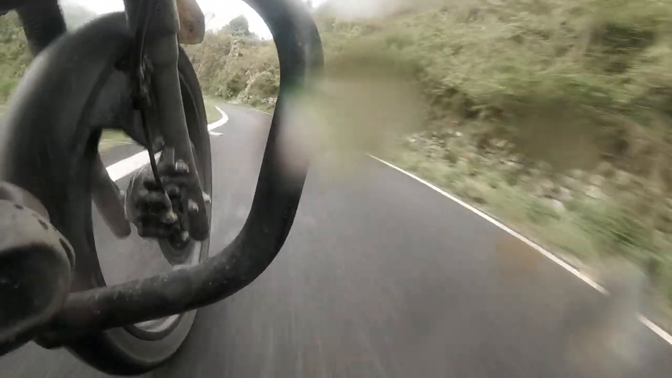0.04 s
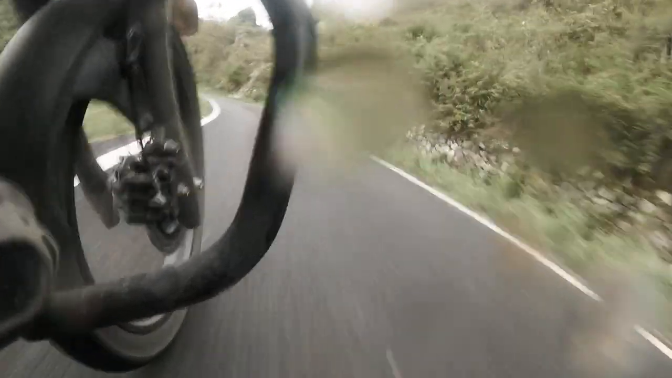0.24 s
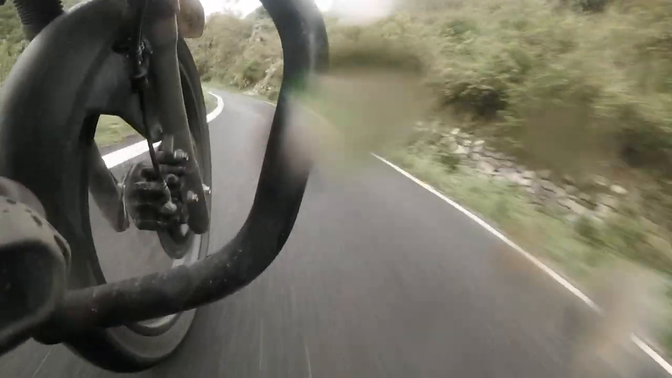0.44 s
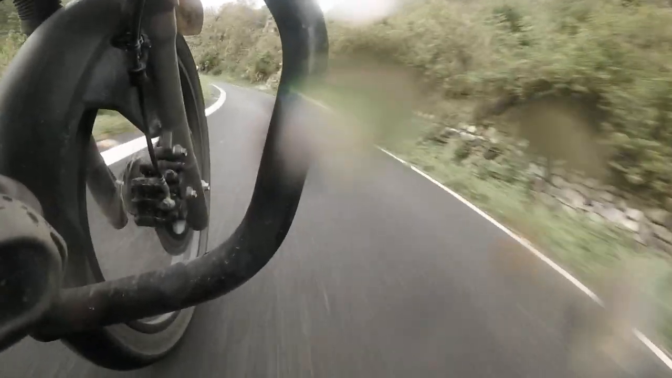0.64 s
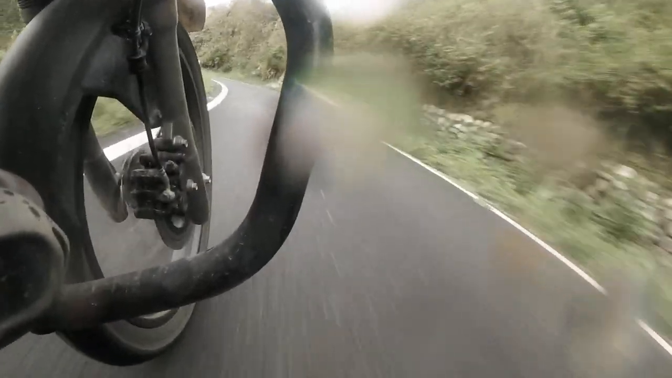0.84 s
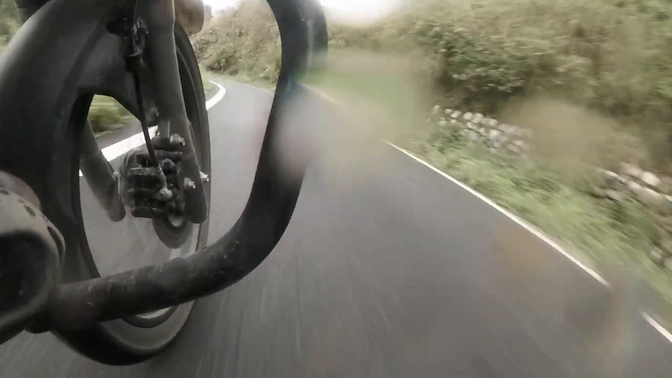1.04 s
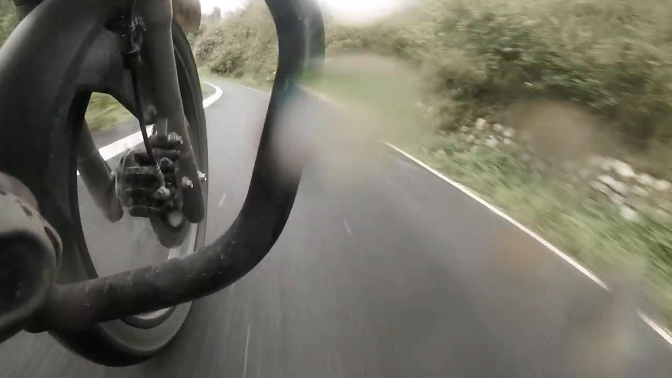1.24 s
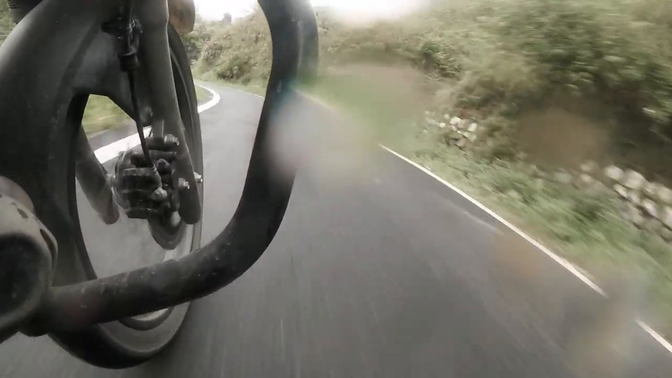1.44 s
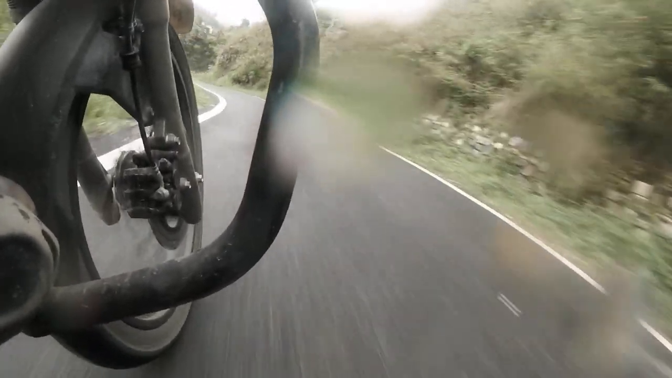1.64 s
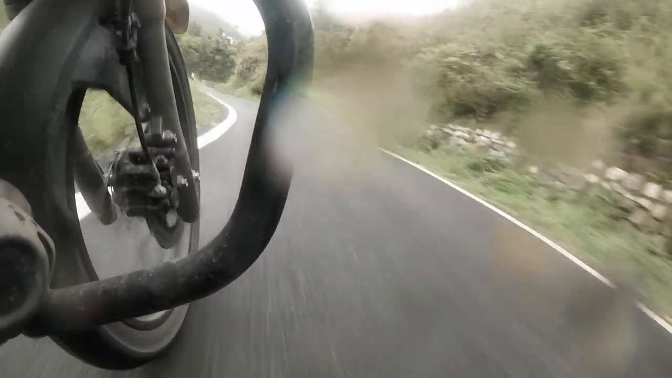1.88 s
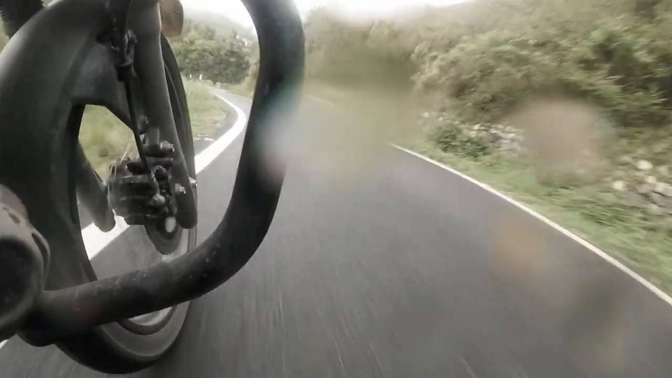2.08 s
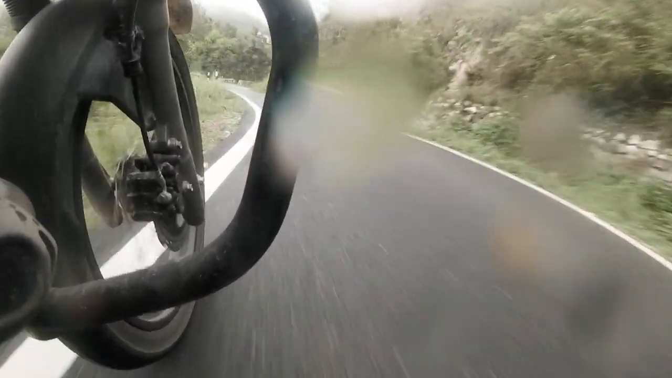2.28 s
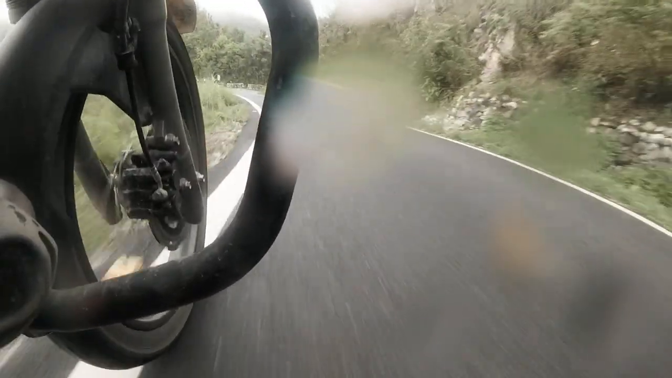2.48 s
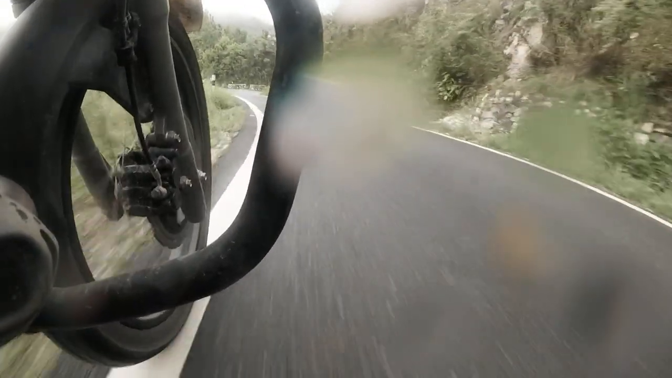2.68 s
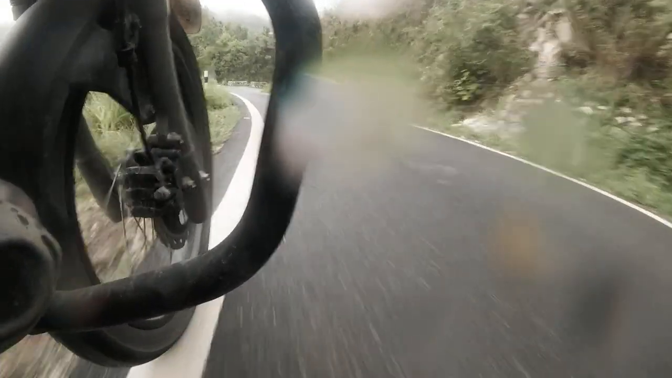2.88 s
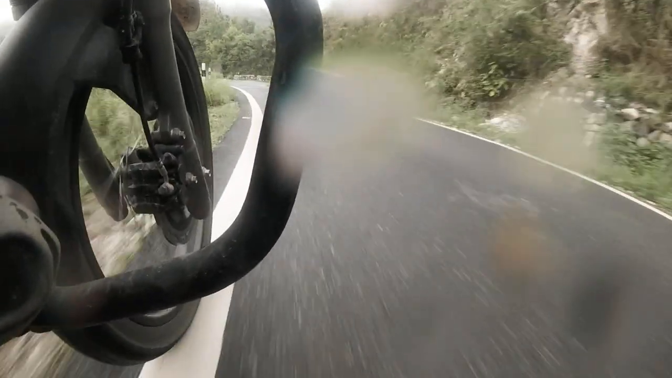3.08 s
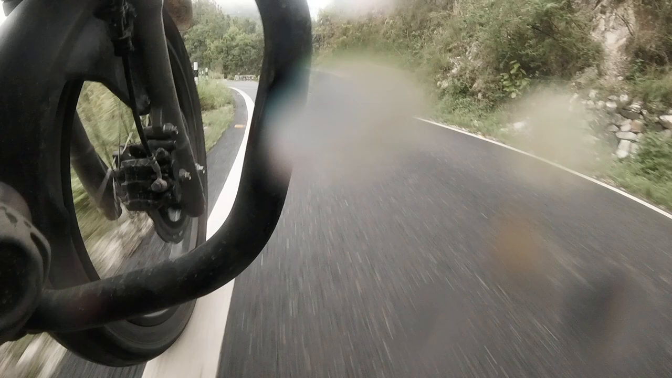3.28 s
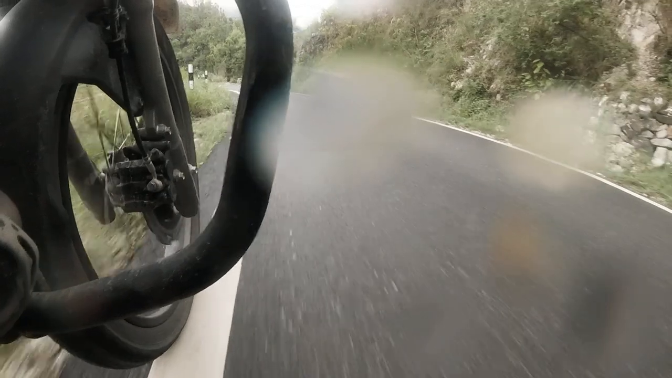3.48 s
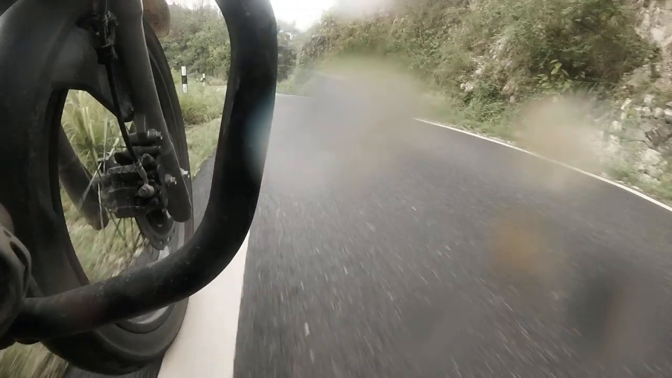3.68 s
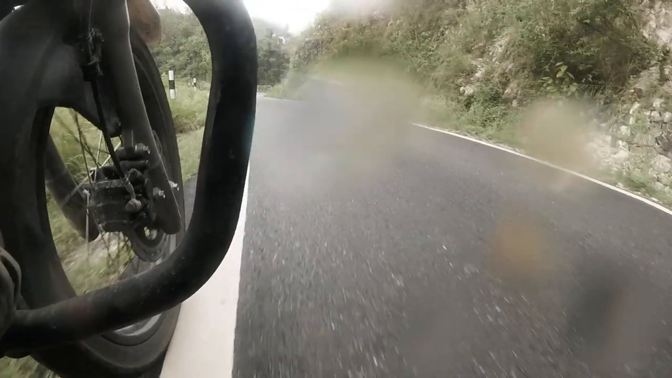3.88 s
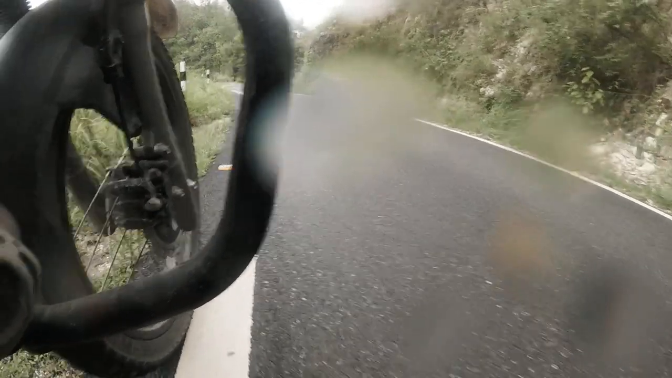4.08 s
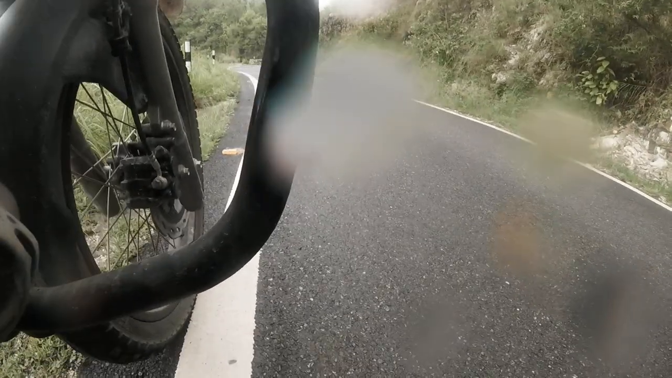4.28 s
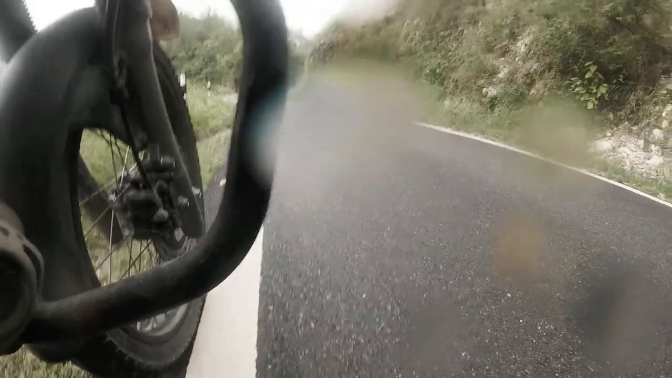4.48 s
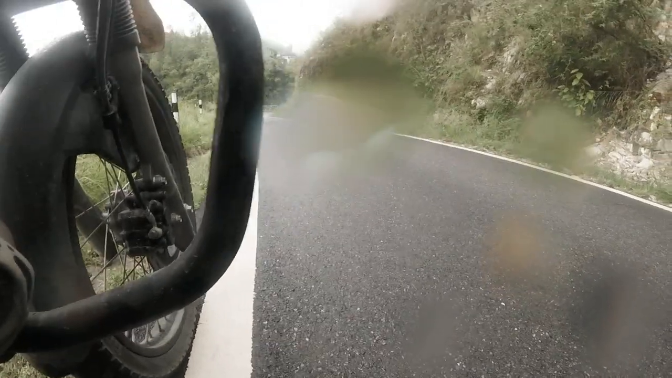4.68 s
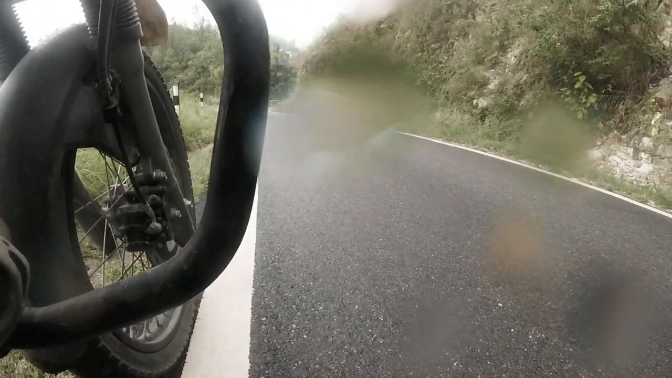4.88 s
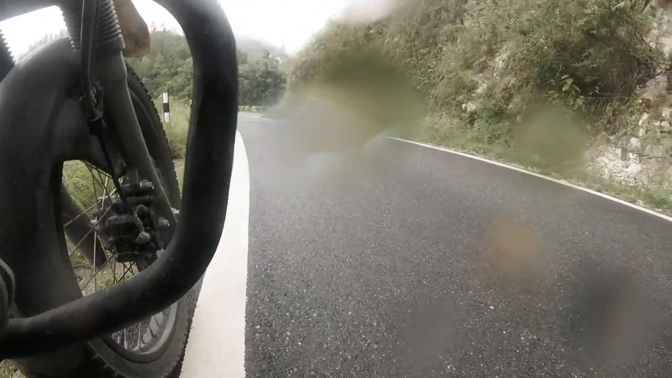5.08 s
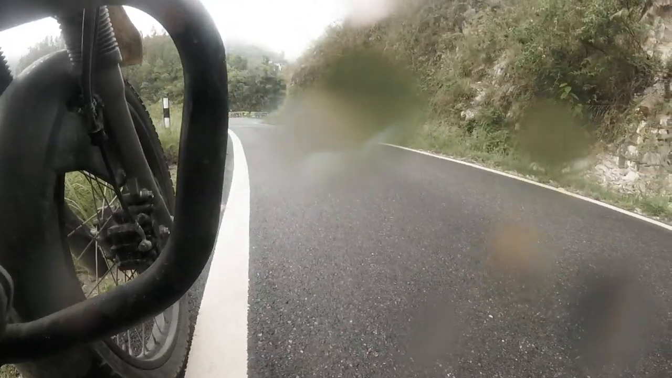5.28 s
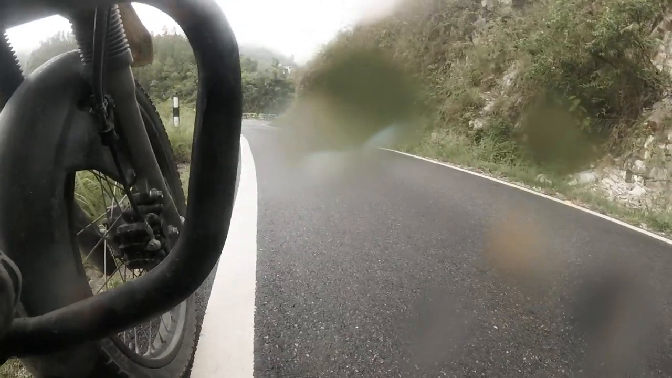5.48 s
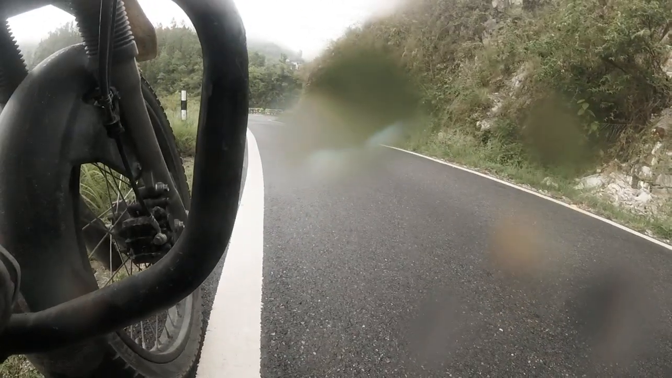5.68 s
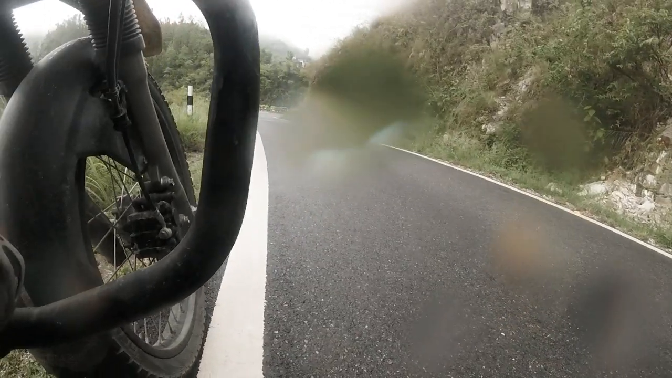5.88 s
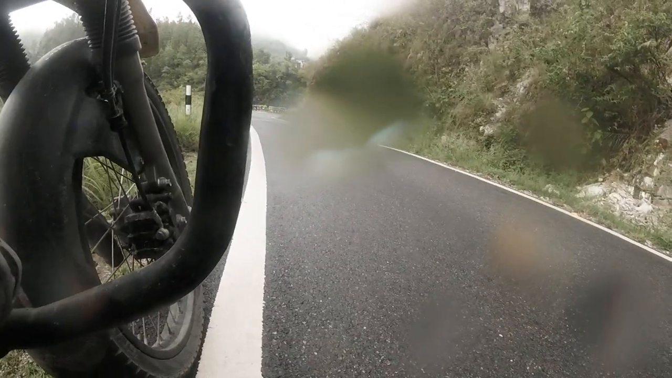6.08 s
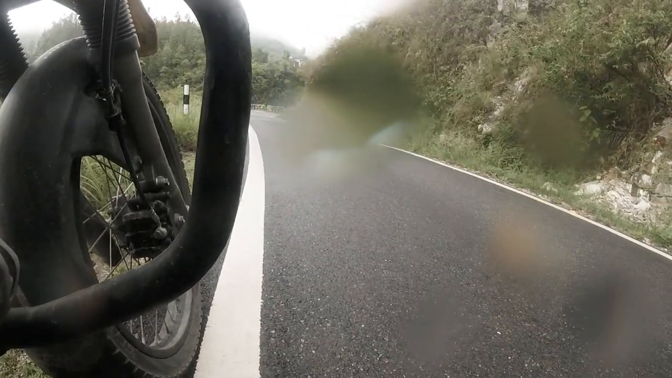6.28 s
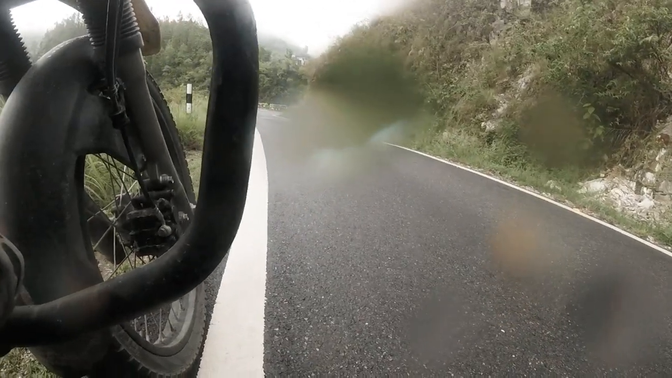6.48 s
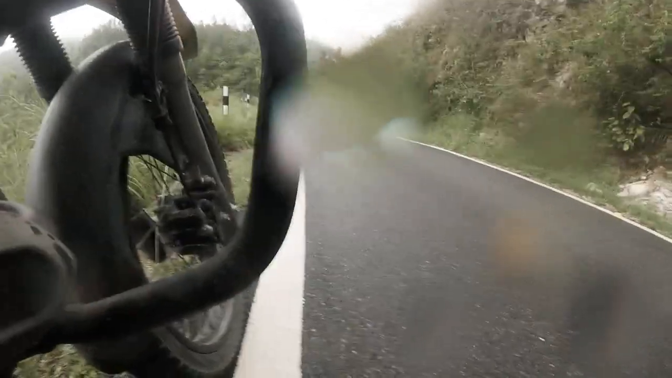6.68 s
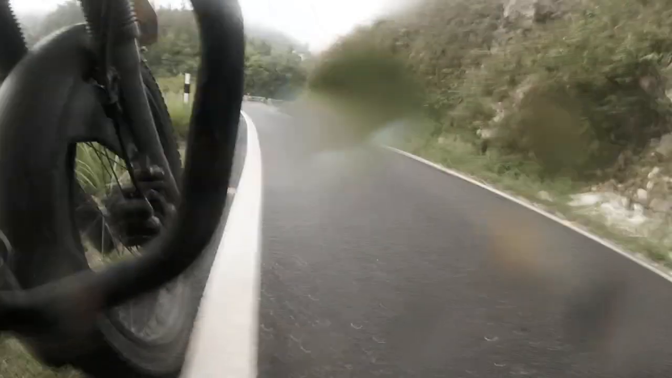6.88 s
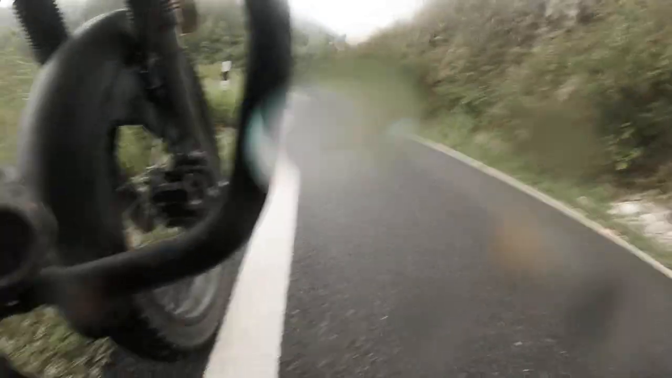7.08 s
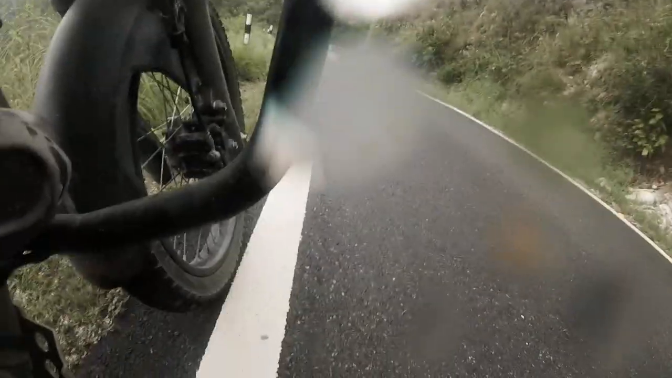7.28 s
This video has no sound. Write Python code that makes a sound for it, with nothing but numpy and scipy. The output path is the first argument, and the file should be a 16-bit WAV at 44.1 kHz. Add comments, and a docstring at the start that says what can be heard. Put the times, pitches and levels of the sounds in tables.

```python
"""Wind buffets and crackles on a closed camera case, low on a motorcycle coasting down a wet road.
The eddies thin out as it stops, and the single cylinder idles in pressure pulses, then is switched
off and runs down with a squeak. A lever snaps, bounces and scrapes; an insect's wings buzz.
Last the bike is tipped: the case thumps, and stick-slip friction makes its mount creak."""
import sys
import numpy as np
from scipy import signal
from scipy.fft import rfft, irfft, next_fast_len
from scipy.io import wavfile
from scipy.ndimage import uniform_filter1d, map_coordinates

SR = 44100
rng = np.random.default_rng(int(sys.argv[2]) if len(sys.argv) > 2 else 0)


def unload_wav(signal):
    """Save mono or channel-first audio to the path in sys.argv[1] as 16-bit WAV at rate SR, clipped to [-1, 1]."""
    wavfile.write(
        sys.argv[1],
        SR,
        np.round(np.clip(np.atleast_2d(signal).T, -1, 1) * 32767).astype(np.int16),
    )


N = 323694

# Buffeting: time_s, level_db, eddies_per_s
BUFFET = [(0, -14.5, 61.5), (.15, -17.5, 64.5), (.5, -17, 54.5), (.8, -18.5, 60.5), (1.1, -20, 52.5),
          (1.45, -17.5, 57), (1.7, -17, 45), (2.15, -21.5, 40), (2.55, -21, 34.5), (2.9, -23.5, 31),
          (3.2, -27.5, 29), (3.5, -30, 27), (4.0, -46.5, 22.3)]
# Colour of the wind at high and at low speed: frequency_hz, gain_db
FAST_WIND_SPECTRUM = [(12, -33), (20, -5.5), (47, 3), (65, -2), (90, -3.5), (126, -9.5), (349, -14.5),
                      (509, -24.5), (742, -31.5), (4000, -73), (5200, -99), (8800, -120)]
SLOW_WIND_SPECTRUM = [(12, -35), (20, 0), (43, -3.5), (416, -25), (841, -45), (921, -42), (1050, -52),
                      (1140, -49), (1500, -42), (1950, -73.5), (3300, -120)]
# Sharpest eddies: time_s, level_db, sign
PRESSURE_STEPS = [(0.0705, -10, 1), (0.1171, -16, 1), (0.2216, -17, 1), (0.238, -15, 1), (0.259, -16, -1),
                  (0.286, -14, 1), (0.615, -13, 1), (0.6286, -17, -1), (0.6718, -14, 1), (0.698, -13, 1),
                  (0.757, -16.5, 1), (0.855, -14, 1), (0.8742, -17, 1), (1.003, -14, 1), (1.328, -22, -1),
                  (1.3408, -16, 1), (1.3653, -13, -1), (1.4186, -13.5, 1), (1.4686, -21, 1),
                  (1.4902, -16.5, -1), (1.5268, -20, 1), (1.5732, -14, 1), (1.7142, -19, -1),
                  (1.7363, -19, 1), (1.8026, -14, 1), (1.9425, -16.5, -1), (1.9953, -14, 1),
                  (2.0628, -18.5, 1), (2.1216, -14.5, -1), (2.3433, -16.5, 1), (2.4306, -14, 1),
                  (2.5464, -18, -1), (2.5957, -18, 1), (2.8768, -18.5, 1), (3.261, -19, 1)]
# Band of the noise over each step: centre_hz, width_hz, gain_db
SPIT_BAND = [(1400, 2400, 4)]
# Steady stretches of idling: start_s, firing_gap_s
IDLE_STRETCHES = [(3.491, .0746), (4.013, .0813), (4.338, .0752)]
# Engine noise: time_s, level_db
ENGINE_RUSH = [(0, -38.5), (.6, -48.5), (1.7, -47), (2.7, -44), (3.5, -37), (4, -35.5), (4.65, -32.5),
               (5.08, -33), (5.3, -35), (5.45, -39), (5.6, -48), (5.7, -55)]
# Its bright and dark parts: frequency_hz, gain_db
HISS_SPECTRUM = [(1060, -32.5), (1800, -9), (2140, -16), (2330, -5.5), (2840, -6), (3110, -4.5), (3580, -8),
                 (4050, -9.5), (4360, -10), (6070, -3), (7810, -14.5), (10200, -23.5), (17200, -120)]
BODY_SPECTRUM = [(120, -43), (220, -17), (300, -6), (674, -6), (798, -11.5), (897, -10.5), (1510, -9.5),
                 (2500, -17), (3250, -37), (5500, -120)]
# Engine castings, and rings that emerge in the run-down: centre_hz, width_hz, gain_db
CASTING_MODES = [(450, 30, -5), (650, 25, -3), (720, 22, -3), (795, 32, 3), (985, 13, 2), (1110, 18, -2),
                 (1310, 35, -4), (1485, 26, 0), (1640, 26, -2), (2280, 28, -12), (3040, 45, -12)]
RUN_DOWN_MODES = [(447, 30, -3), (985, 9, 5), (1075, 20, -5)]
# Thin metal ringing in the hiss: centre_hz
FIN_MODES = [3990, 4600, 5000, 5370, 5850, 6050, 6270, 6500]
# Squeak: time_s, pitch_hz, level_db
SQUEAK_GLIDE = [(5.547, 4900, -64), (5.556, 5450, -47), (5.582, 5730, -46), (5.6, 5200, -42.5),
                (5.635, 4970, -57), (5.665, 4600, -65), (5.685, 4800, -69)]
# Single slips of the mount: start_s, high_db, low_db
MOUNT_SLIPS = [(6.669, -52, -67), (6.6916, -32, -37), (6.696, -34, -45), (6.7118, -20.5, -22),
               (6.726, -24, -26), (6.772, -44, -56), (6.7916, -25, -34), (6.801, -21.5, -40),
               (6.805, -23, -38), (6.809, -36, -35), (6.812, -21, -18.5), (6.8152, -25, -27),
               (6.8302, -23, -32), (6.847, -26, -33), (6.855, -27, -22), (6.874, -21, -32),
               (6.88, -11, -25), (6.897, -19, -43), (6.9006, -18, -36), (6.969, -23, -19),
               (7.0642, -65, -31), (7.073, -60, -42), (7.124, -53, -54), (7.2253, -32, -11.5),
               (7.232, -49, -30.5), (7.2388, -52, -20), (7.2565, -47, -43), (7.314, -48, -54)]
# Dense creaks: start_s, length_s, first_db, last_db, steady_grind_share
DENSE_CREAKS = [(6.882, 0.083, -26, -14.5, 0.26), (7.13, 0.095, -47, -22.5, 0.2),
                (7.24, 0.017, -57, -40, 0.3), (7.29, 0.04, -43, -43, 0.1)]
# High, middle and low mode groups of the case: centre_hz, width_hz, gain_db
CASE_MODES = [
    [(5210, 780, 3.5), (6500, 430, 7), (7800, 800, -6.5), (10300, 4600, -16.5)],
    [(1230, 460, -26), (2140, 380, 2), (3100, 2900, -12.5)],
    [(190, 177, 2.5), (470, 200, 2.5), (740, 240, 3)],
]
# Knocks on the case: start_s, level_db, brightness_db
CASE_KNOCKS = [(6.3049, -6.5, -14.5), (6.317, -33, 6), (6.326, -36.5, 8), (6.344, -36.5, 9),
               (6.357, -34.5, 2), (6.4, -45, -1), (6.409, -30, -6), (6.417, -32, -10), (6.55, -36, 0.5)]
# Shifts of weight: time_s, level_db, swing_hz, shudder_db
WEIGHT_SHIFTS = [(5.9, -27, 60, -38.5), (6.442, -24, 34, -44.5), (6.52, -40, 40, -45),
                 (6.702, -23, 70, -56), (6.741, -20, 60.4, -47), (6.774, -21.5, 28.8, -52),
                 (6.815, -14, 111, -30.5), (6.862, -14.5, 89.5, -53), (6.989, -7, 39.2, -26.5),
                 (7.012, -16.5, 25.7, -57), (7.21, -9, 114, -26.5), (7.248, -15, 69.4, -29.5)]
# Lever and scraped frame: centre_hz, width_hz, gain_db
LEVER_MODES = [(740, 150, -11), (1320, 250, -7), (1850, 200, -8), (2280, 160, 3), (3000, 700, -14),
               (3900, 500, -13), (5200, 450, -8), (6100, 900, -14)]
FRAME_MODES = [(1650, 500, -10), (2220, 320, -1), (3100, 800, -12), (3950, 450, -10), (5200, 700, -8),
               (6400, 900, -12)]
# Scraping: time_s, level_db, low_ring_db
SCRAPE_LEVELS = [(5.703, -29, -35.5), (5.76, -40, -41), (5.8, -48, -45.5), (5.87, -45.5, -43.5),
                 (5.92, -39.5, -44.5), (5.98, -42.5, -50.5), (6.01, -46, -63), (6.13, -53.5, -65),
                 (6.19, -63, -68)]
# Insect buzz and rocking of the frame: time_s, level_db
BUZZ_LEVELS = [(6.15, -65), (6.185, -57.5), (6.3, -56.5), (6.494, -54.5), (6.503, -61), (6.525, -72)]
SWAY_LEVELS = [(3.2, -36.5), (3.7, -39.5), (4.2, -39.5), (4.9, -37.5), (5.15, -38), (5.4, -44.5),
               (6.0, -46.5), (6.3, -43), (6.6, -42.5), (7.34, -41)]
# Still air: frequency_hz, gain_db
AIR_SPECTRUM = [(180, -35), (300, -22), (680, -1.5), (846, -7), (1020, -8.5), (1790, -14), (4340, -31.5),
                (6280, -14), (7810, -20.5), (10200, -32.5), (17200, -120)]

WHEEL_STOP_S, IGNITION_OFF_S = 4.1, 5.015
TIME_S = np.arange(N) / SR


def wind():
    """Turbulence: each eddy pushes on the case; fewer and duller ones come as the bike slows."""
    buffet = curves(BUFFET)[0]
    crackle_level = amp(-34 - 2 * TIME_S + wobble(8.02)) * (buffet / amp(-20.5)) ** .54
    times, _, eddies_per_s = np.transpose(BUFFET)
    eddies = pulses(np.interp(TIME_S, times, eddies_per_s), jitter=.12, scatter_db=3)
    drive = unit(eddies) + .73 * amp(.64 * wobble(14)) * rng.standard_normal(N)
    dull = filtered(drive, lambda hz: 1 / (1 + (hz / 280) ** 4))
    slow = np.clip((TIME_S - .8) / .89, 0, 1)
    push = (1 - slow) * coloured(dull, FAST_WIND_SPECTRUM) + slow * coloured(dull, SLOW_WIND_SPECTRUM)
    return buffet * push + crackle_level * crackle(eddies) + slaps()


def crackle(eddies):
    """Eddy breakdown: the flow tears at the crests and in between, in pops, bursts and steady noise."""
    pops = eddies ** 1.1 + pulses(np.full(N, 190.), jitter=.55, scatter_db=4.2)
    bursts = signal.oaconvolve(pops, np.hanning(260), "same") * rng.standard_normal(N)
    tearing = amp(1.3 * wobble(30.3)) * rng.standard_normal(N)
    rough = .85 * unit(pops) + .75 * unit(bursts) + .4 * tearing

    def colour(hz):
        lift_db = 4 * np.exp(-3 * np.log((hz + 1) / 1700) ** 2)
        tilt = (hz / 300) ** .61 / (1 + (300 / (hz + 1)) ** 4)
        return -1j * amp(along(FAST_WIND_SPECTRUM, hz) + lift_db) * tilt
    return unit(filtered(rough, colour))


def slaps():
    """Pressure steps: a sharp eddy builds, jumps and sinks back under a spit of noise."""
    build_s, jump_s, fall_s = .0033, .00021, .0019
    t = np.arange(-SR // 50, SR // 50) / SR
    step = .99 * np.tanh(t / jump_s) * np.exp(np.where(t < 0, t / build_s, -t / fall_s))
    times, db, sign = np.transpose(PRESSURE_STEPS)
    starts = times + t[0]
    spits = place(starts, amp(db - 24), np.exp(-(t / .0021) ** 2)) * rng.standard_normal(N)
    return place(starts, sign * amp(db), step) + ringing(ringing(spits, SPIT_BAND), SPIT_BAND)


def engine():
    """Periodic excitation: strokes come steadily at idle, then ever further apart without ignition."""
    ends = [start for start, _ in IDLE_STRETCHES[1:]] + [IGNITION_OFF_S]
    idle = [np.arange(start, end - gap / 2, gap) for (start, gap), end in zip(IDLE_STRETCHES, ends)]
    first_gap_s, gap_growth_s = .081, .0235
    k = np.arange(6)
    coast = IGNITION_OFF_S + k * first_gap_s + k * (k - 1) / 2 * gap_growth_s
    strokes = np.concatenate(idle + [coast])
    return exhaust(strokes) + clatter_and_spray(strokes, coast)


def exhaust(strokes):
    """Pulse radiation: each firing is a dip and a rise of pressure; unfired strokes invert and fade."""
    unfired = strokes >= IGNITION_OFF_S
    rush_db = np.interp(strokes, *np.transpose(ENGINE_RUSH))
    db = -27.5 + 1.7 * (rush_db + 35) + 1.5 * rng.standard_normal(len(strokes)) - 2 * np.cumsum(unfired)
    u = np.arange(-5, 14, 1 / (.0028 * SR))  # time in units of 2.8 ms
    beat = 1.6 * u * np.exp(-u * u / 2) - .4 * np.exp(-(u - 3.3) ** 2 / 2)
    beat += .3 * np.exp(-(u - 6) ** 2 / 3)
    beat -= np.hanning(len(u)) * 2 * beat.mean()  # the pipe holds no steady pressure
    return place(strokes + .0011, np.where(unfired, -1, 1) * amp(db), beat)


def clatter_and_spray(strokes, coast):
    """Amplitude modulation: strokes and valves pulse the engine's noise; tyre spray joins its hiss."""
    gate = place(strokes, np.ones(len(strokes)), np.hanning(1500))
    valves = place(strokes + .0452, np.ones(len(strokes)), np.hanning(700))
    off_s = np.clip(TIME_S - IGNITION_OFF_S, 0, 1)
    # The slower it turns, the more each stroke stands out, until the squeak.
    wheeze = place(coast - .008, coast < SQUEAK_GLIDE[0][0], np.exp(-TIME_S[:SR // 10] / .015))
    rush = curves(ENGINE_RUSH)[0] * amp(16 * np.minimum(off_s, .47) * wheeze)
    swell = .25 * wobble(6.5) + .4 * wobble(21.915)
    clatter = amp(.85 * swell + 2.6 * gate + 4.1 * valves)
    castings = unit(ringing(clatter * patchy(2.0), CASTING_MODES))
    last_rings = .9 * off_s * unit(ringing(rng.standard_normal(N), RUN_DOWN_MODES))
    body = amp(-6.5) * clatter * coloured(patchy(.75), BODY_SPECTRUM) + .5 * castings + last_rings
    spray = amp(-63) * np.clip(WHEEL_STOP_S - TIME_S, 0, 1)
    hiss_level = (rush * amp(-9 - 10.5 * off_s) + spray) * amp(1.24 * swell + 3.3 * gate + 4.5 * valves)
    fins = lambda hz: 1 + sum(1.1 / (1 + ((hz - fin) / 35) ** 2) for fin in FIN_MODES)
    hiss = unit(filtered(patchy(1.7), lambda hz: amp(along(HISS_SPECTRUM, hz)) * fins(hz)))
    return rush * body + hiss_level * hiss


def squeak():
    """Flow whistle: the last pressure escapes in a thin tone that rises, falls and turns breathy."""
    times, hz, db = np.transpose(SQUEAK_GLIDE)
    jitter = np.interp(TIME_S, [5.6, 5.65], [.014, .04])
    pitch_hz = np.interp(TIME_S, times, hz) * (1 + jitter * wobble(500))
    level = amp(np.interp(TIME_S, times, db, -150, -150) + 8 + 2.9 * wobble(150))
    return level * np.sin(2 * np.pi * np.cumsum(pitch_hz) / SR)


def mount():
    """Stick-slip friction: each slip of the mount rings the high, middle and low modes of the case."""
    starts, high_db, low_db = np.transpose(MOUNT_SLIPS)
    k, scatter = np.arange(6), rng.standard_normal((6, 2))
    starts = np.append(starts, 6.9785 + .012 * k + .0004 * scatter[:, 0])  # a dull run that settles
    t = TIME_S[:SR // 50]
    ratchet = pulses(np.full(N, 175.), jitter=.25, scatter_db=2.5)
    steady = np.interp(TIME_S, *np.transpose(DENSE_CREAKS)[[0, 4]])
    noise = rng.standard_normal(N)
    grind = (signal.oaconvolve(ratchet, np.exp(-t / .0037))[:N] + steady) * noise - 9.6 * ratchet
    swell_db = creak_envelope_db() + 20
    # Each triple runs high, middle, low.
    slip_db, lift_db = (high_db, (high_db + low_db) / 2 - 5, low_db), (8, 16, 24)
    settle_db, loss_db = (-46, -21, -16), (4, 5, 3.5)
    creak_db, growth = (-32, -35, -19.5), (1, 1, .98)
    rasp_s, top_hz = (.0012, .0012, .0015), (11300, 3600, 2600)
    sound = np.zeros(N)
    for band, modes in enumerate(CASE_MODES):
        run_db = settle_db[band] - loss_db[band] * k + .69 * scatter[:, 1]
        gains = amp(np.append(slip_db[band], run_db) + lift_db[band])
        rasp = place(starts, gains, np.exp(-t / rasp_s[band]) + .068 * np.exp(-t / .0088)) * noise
        release = place(starts, gains, [1.])
        sound += ringing(.55 * rasp - 1.3 * release, modes, top_hz[band])
        sound += amp(creak_db[band] + growth[band] * swell_db) * unit(ringing(grind, modes, top_hz[band]))
    return sound


def creak_envelope_db():
    """Sustained friction: a dense creak starts quickly, holds or swells, and stops suddenly."""
    attack_s, release_db_per_s = .008, 1800
    envelopes = []
    for start, length, first_db, last_db, _ in DENSE_CREAKS:
        times = [start - attack_s, start, start + length, start + length + 60 / release_db_per_s]
        levels_db = [first_db - 15, first_db, last_db, last_db - 60]
        envelopes.append(np.interp(TIME_S, times, levels_db, -200, -200))
    return np.max(envelopes, axis=0)


def knocks():
    """Impact: a knock on the case gives a short pull of pressure, a rebound and a puff of noise."""
    starts, db, bright_db = np.transpose(CASE_KNOCKS)
    t = TIME_S[:SR // 10]
    bell = lambda at_s, width_s: np.exp(-((t - at_s) / width_s) ** 2)
    pull = .5 * bell(.00044, .00029) - bell(.0013, .00038)
    rebound = .3 * bell(.0049, .0018) - .12 * bell(.0106, .0031)
    burst = place(starts, amp(db + bright_db + 4), bell(0, .011)) * rng.standard_normal(N)
    puff = ringing(burst, [(300, 270, 1), (676, 370, .5), (2050, 810, -15)])
    return place(starts, amp(db), pull + rebound) + puff


def lurches():
    """Low-frequency transients: each shift of weight is a single swing of pressure."""
    t = np.arange(-SR // 12, SR // 12) / SR
    swings = np.zeros(N + SR)
    for time_s, db, hz, _ in WEIGHT_SHIFTS:
        first = round((time_s + t[0]) * SR)
        swing = np.sin(2 * np.pi * hz * t) * np.exp(-(t * hz / .35) ** 2)
        swings[first:first + len(t)] -= amp(db) * swing
    return swings[:N]


def lever():
    """Inelastic rebound: a sprung lever snaps home and bounces, each blow ringing it more weakly."""
    snap_s, bounce_s = 5.7008, .0185
    k = np.arange(5)
    starts, db = snap_s + bounce_s * k, -15 - 2.5 * k ** 1.2
    t = TIME_S[:SR // 8]
    blow = np.exp(-t / .0028) * (1 - np.exp(-t / .001))
    blows = place(starts, amp(db), blow) * rng.standard_normal(N)
    cracks = place(starts, amp(db - 5 - 8 * k), blow) * rng.standard_normal(N)
    ring = 5.9 * ringing(blows, LEVER_MODES, top_hz=7000)
    return ring + ringing(cracks, [(5000, 3300, 0)], top_hz=10000)


def scrape():
    """Sliding friction: the lever drags over the frame in quick slips that excite its modes."""
    level, low_level = curves(SCRAPE_LEVELS)
    t = TIME_S[:SR // 8]
    slips = pulses(np.full(N, 70.), jitter=.4, scatter_db=2.5)
    slip_shape = t / .0019 * np.exp(1 - t / .0015)
    rub = rng.standard_normal(N) * (1 + signal.oaconvolve(slips, slip_shape)[:N])
    low_ring = unit(ringing(rub, [(753, 190, -3), (310, 140, -13)]))
    return level * unit(ringing(rub, FRAME_MODES)) + low_level * low_ring


def insect():
    """Pulse-train buzz: each wing stroke is a falling chirp blurred by noise; the beat slows a little."""
    wing_hz = 120 - 16 * np.clip(TIME_S - BUZZ_LEVELS[0][0], 0, 1)
    beats = pulses(wing_hz, jitter=.008, scatter_db=1.5)
    chirp_hz, fall_hz_per_s, width_s = 5550, 260000, .0017
    t = np.arange(-SR // 200, SR // 200) / SR
    stroke = np.exp(-(t / width_s) ** 2 / 2)
    chirp = stroke * np.cos(2 * np.pi * (chirp_hz - fall_hz_per_s * t / 2) * t)
    chirps = unit(signal.oaconvolve(beats, chirp, "same"))
    noise = (signal.oaconvolve(beats, stroke, "same") + .7) * rng.standard_normal(N)
    rasp = unit(filtered(noise, lambda hz: 1 / (1 + ((hz - 5450) / 600) ** 10)))
    return curves(BUZZ_LEVELS)[0] * unit(1.5 * chirps + rasp)


def frame_rumble():
    """Forced vibration: the frame rocks slowly, and the idling engine and every lurch shake it."""
    rocking = curves(SWAY_LEVELS)[0] * amp(1.5 * wobble(6.1))
    fade_in = (TIME_S - IDLE_STRETCHES[0][0]) / .56
    fade_out = (IGNITION_OFF_S - TIME_S) / .091 + 1
    running = np.clip(np.minimum(fade_in, fade_out), 0, 1)
    shaking = amp(-15.5) * curves(ENGINE_RUSH)[0] * running + amp(-55.5) * (TIME_S > IGNITION_OFF_S)
    times, _, _, shudder_db = np.transpose(WEIGHT_SHIFTS)
    reach_s = .045
    shaking += place(times - reach_s, amp(shudder_db), np.hanning(int(2 * reach_s * SR)))
    deep = coloured(rng.standard_normal(N), [(12, -42), (22, -11), (50, -9), (85, -24), (160, -59)])
    lumpy = amp(3 * wobble(25)) * rng.standard_normal(N)
    spectrum = [(40, -20), (100, 3), (170, -2), (330, -8.5), (700, -26), (1200, -37), (3000, -54)]
    return rocking * deep + shaking * coloured(lumpy, spectrum)


def still_air(near):
    """Gain control: faint air noise ducks under near sounds and returns slowly."""
    memory = np.exp(-1 / (.12 * SR))
    near_rms = np.sqrt(np.abs(signal.lfilter([1 - memory], [1, -memory], near ** 2)))
    return amp(-57 - 2) * coloured(patchy(2.7), AIR_SPECTRUM) / (1 + near_rms / .2)


def amp(db):
    """Decibels as an amplitude ratio."""
    return 10 ** (np.asarray(db) / 20)


def unit(x):
    """Normalisation to an rms of one."""
    return x / np.sqrt(np.mean(x ** 2) + 1e-20)


def along(points, hz):
    """Interpolation on a log frequency axis."""
    knots_hz, values = np.transpose(points)
    return np.interp(np.log(hz + 1), np.log(knots_hz + 1), values)


def curves(rows):
    """Envelopes: a gain curve for each dB column, silent outside the table."""
    times, *columns = np.transpose(rows)
    return [amp(np.interp(TIME_S, times, db, -150, -150)) for db in columns]


def wobble(rate):
    """Smooth random modulation, rate knots a second."""
    return map_coordinates(rng.standard_normal(int(N * rate / SR) + 4), [np.arange(N) * rate / SR])


def filtered(x, response):
    """Linear filtering: the spectrum times a complex response."""
    size = next_fast_len(N + SR // 5)
    return irfft(rfft(x, size) * response(np.fft.rfftfreq(size, 1 / SR)), size)[:N]


def coloured(x, spectrum):
    """Spectral shaping by (frequency_hz, gain_db) points, at unit rms."""
    return unit(filtered(x, lambda hz: amp(along(spectrum, hz))))


def ringing(x, modes, top_hz=SR):
    """Resonance: (centre_hz, width_hz, gain_db) modes of alternating sign, rolled off above top_hz."""
    def response(hz):
        total = sum((-1) ** k * amp(db) * 1j * hz * width / (centre ** 2 - hz ** 2 + 1j * hz * width)
                    for k, (centre, width, db) in enumerate(modes))
        return total / (1 + (hz / top_hz) ** 10)
    return filtered(x, response)


def patchy(depth_db):
    """White noise, modulated in random patches of time and frequency."""
    cells = signal.stft(rng.standard_normal(N + 512), nperseg=512)[2]
    field = uniform_filter1d(uniform_filter1d(rng.standard_normal(cells.shape), 6, 0), 10, 1)
    return signal.istft(cells * amp(depth_db * unit(field)), nperseg=512)[1][:N]


def pulses(rate, jitter, scatter_db):
    """An uneven impulse train, about rate a second."""
    phase = np.cumsum(rate * np.exp(jitter * wobble(40))) / SR
    return (np.diff(np.floor(phase), prepend=0) > 0) * amp(scatter_db * rng.standard_normal(N))


def place(times, gains, shape):
    """Convolution: one scaled copy of shape at each time."""
    impulses = np.bincount(np.round(np.asarray(times) * SR).astype(int), gains, N)
    return signal.oaconvolve(impulses, shape)[:N]


def scene():
    """Superposition: the near sources add over the still air in one channel."""
    near = wind() + engine() + squeak() + lever() + scrape() + insect()
    near += knocks() + lurches() + mount() + frame_rumble()
    return (near + still_air(near))[None]


def record(dry):
    """Saturation and roll-off: peaks round off, the microphone dulls the treble, the band is cut."""
    ceiling, mic_rolloff_hz, top_hz = .6, 10500, 14300
    rounded = dry[0] / (1 + np.abs(dry[0] / ceiling) ** 4) ** (1 / 4)
    return filtered(rounded, lambda hz: (hz < top_hz) / (1 + (hz / mic_rolloff_hz) ** 8))[None]


dry = scene()
out = record(dry)
unload_wav(out)
```